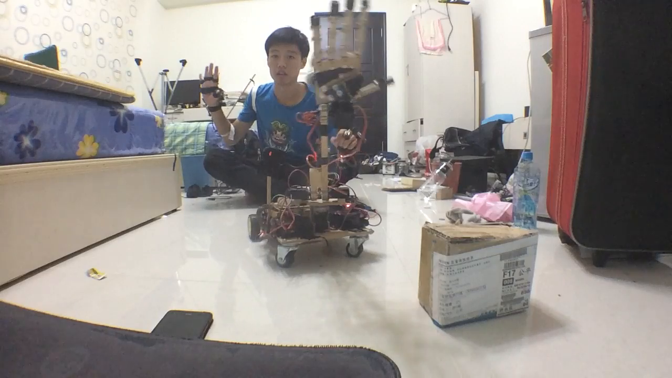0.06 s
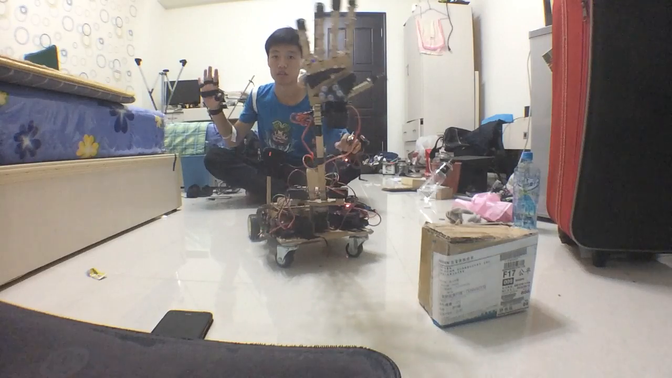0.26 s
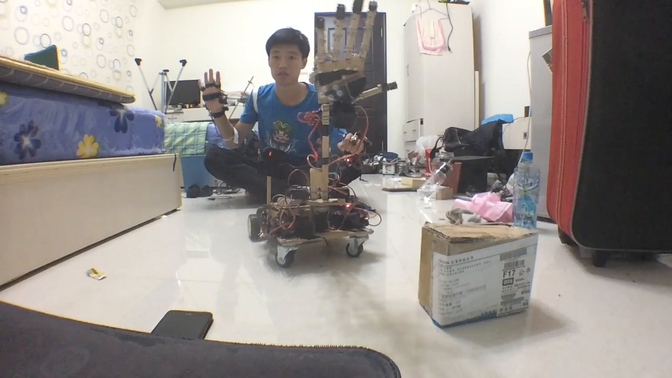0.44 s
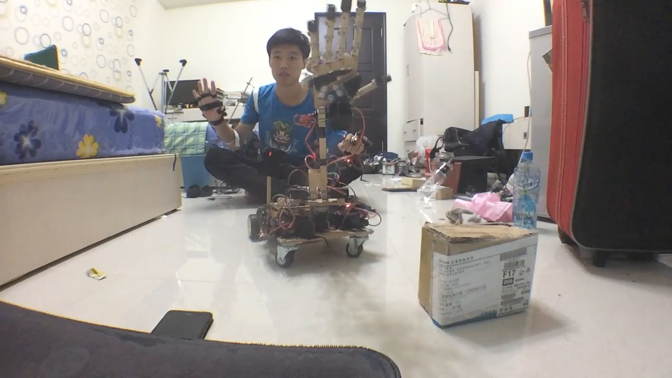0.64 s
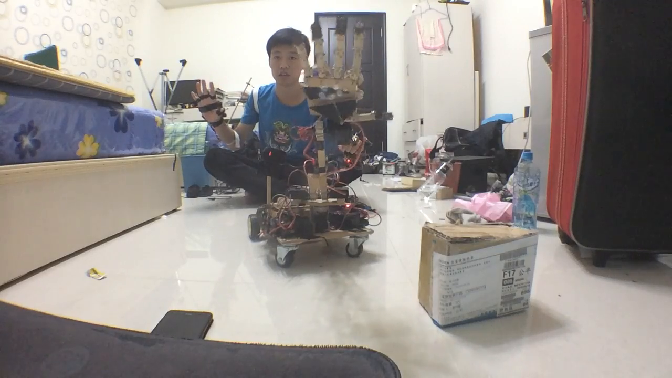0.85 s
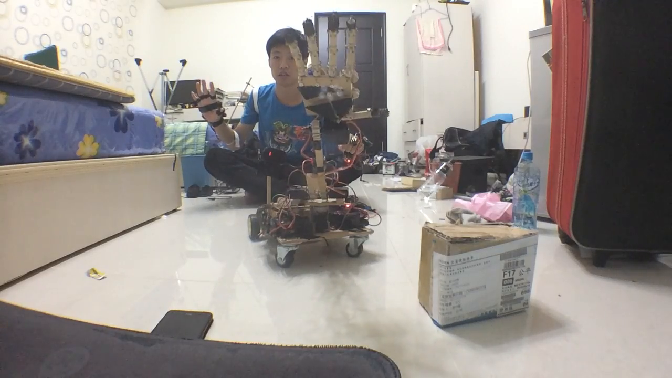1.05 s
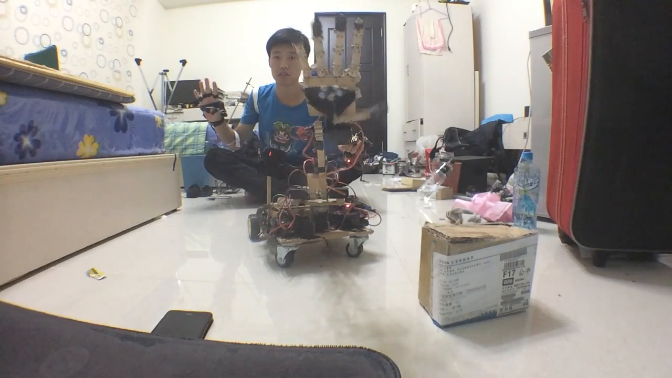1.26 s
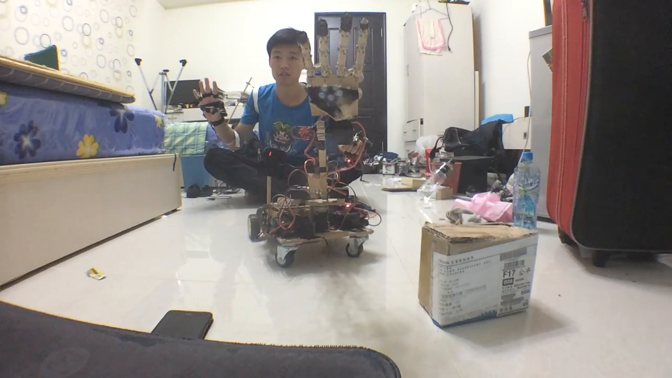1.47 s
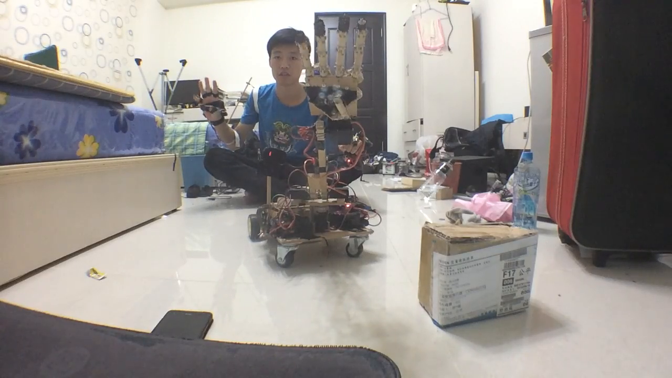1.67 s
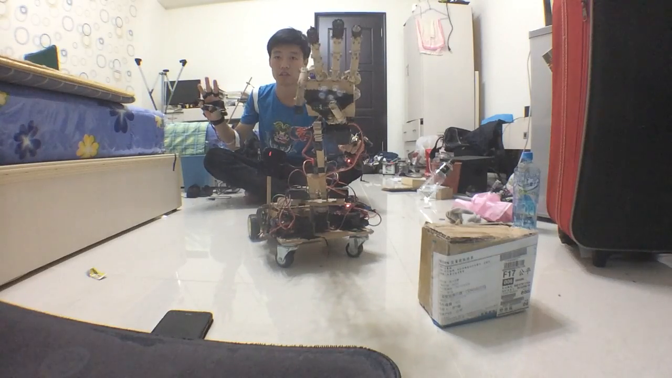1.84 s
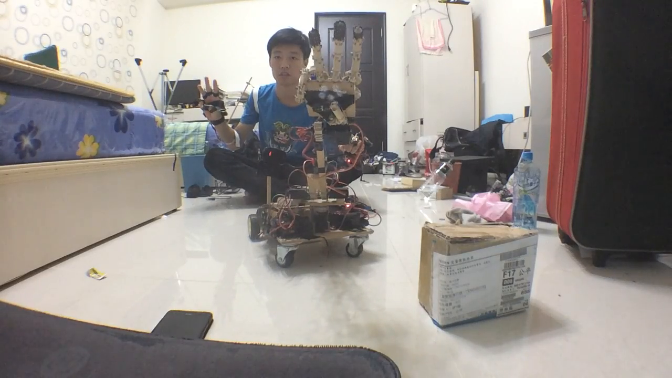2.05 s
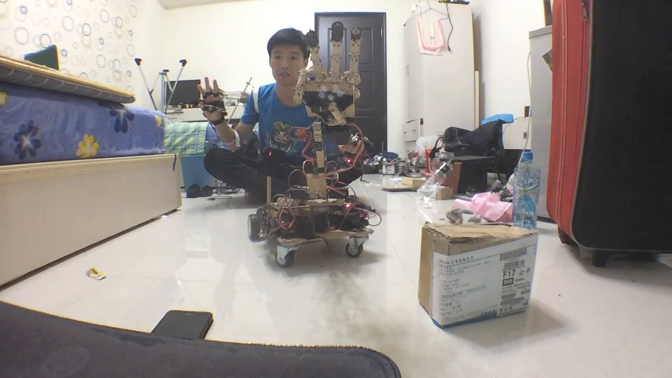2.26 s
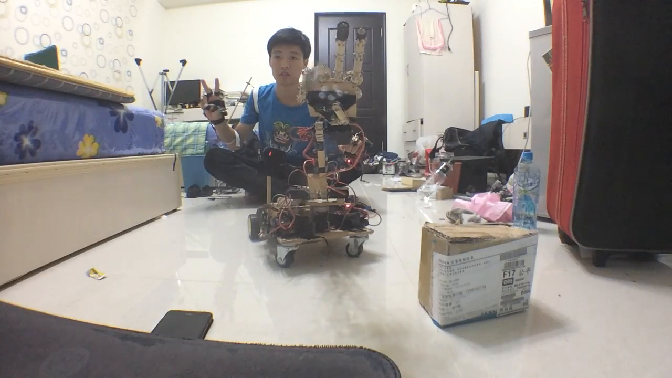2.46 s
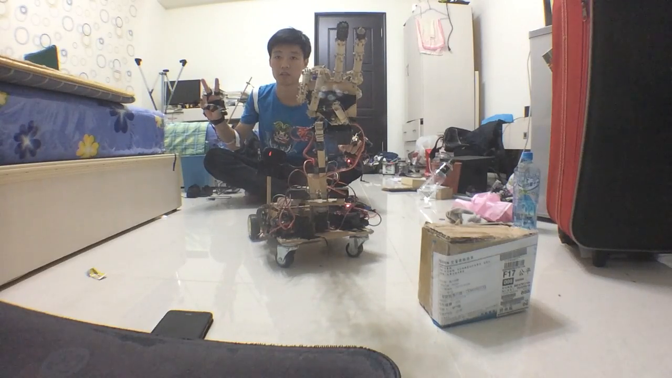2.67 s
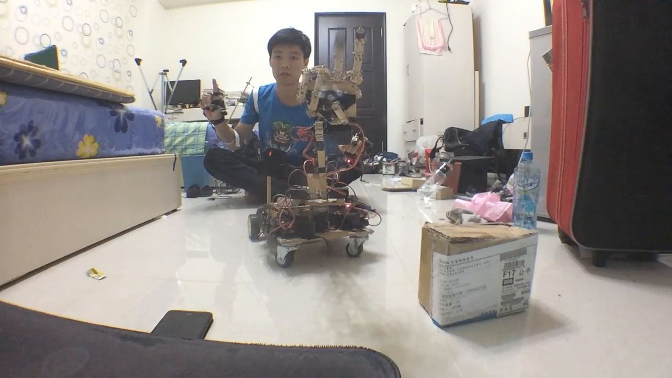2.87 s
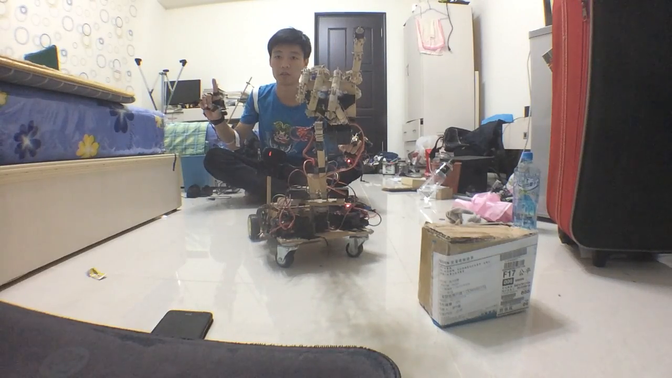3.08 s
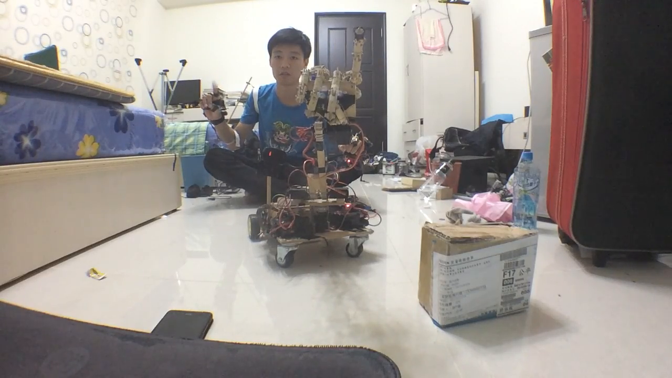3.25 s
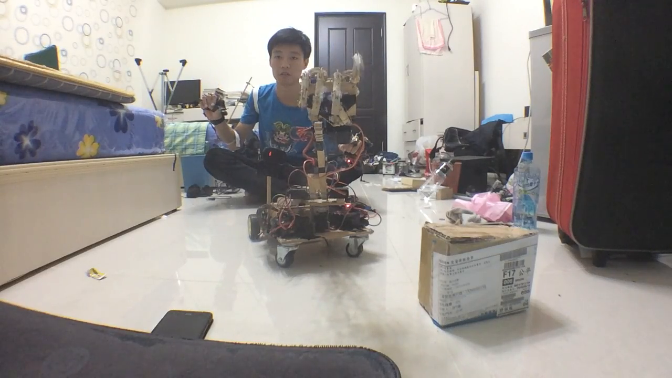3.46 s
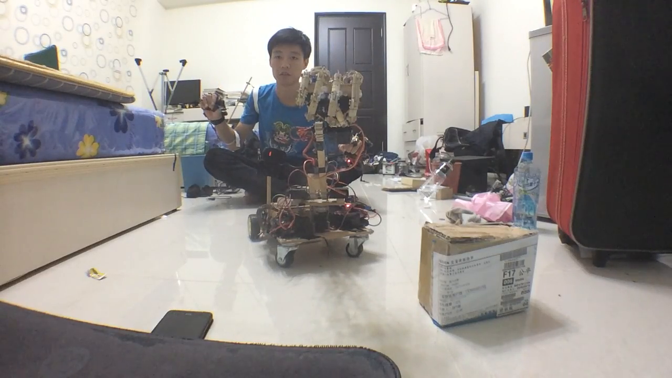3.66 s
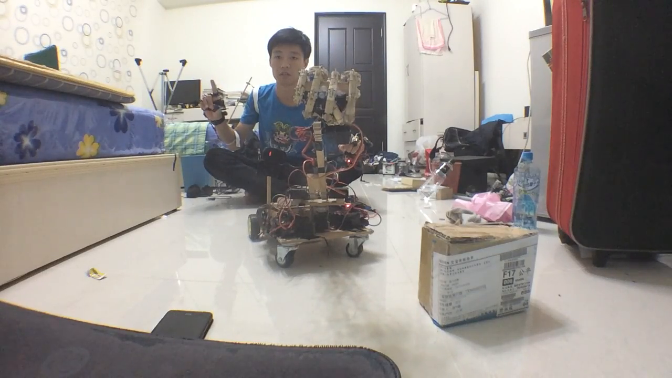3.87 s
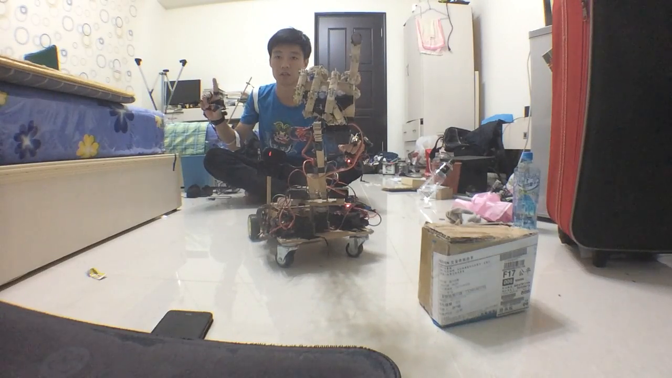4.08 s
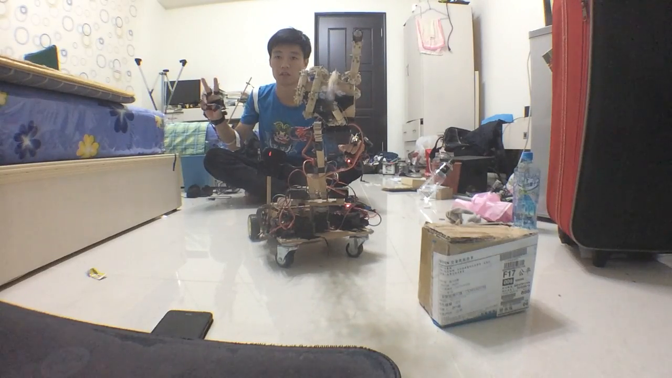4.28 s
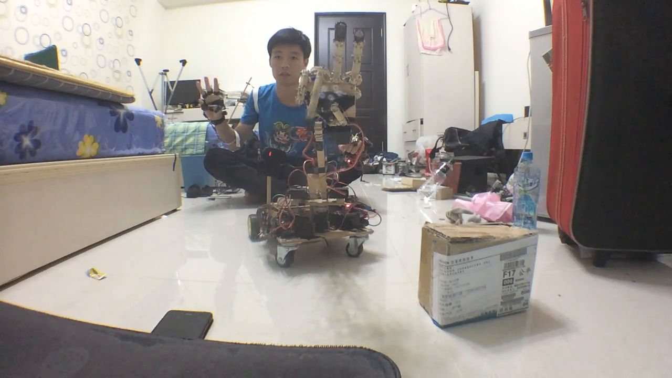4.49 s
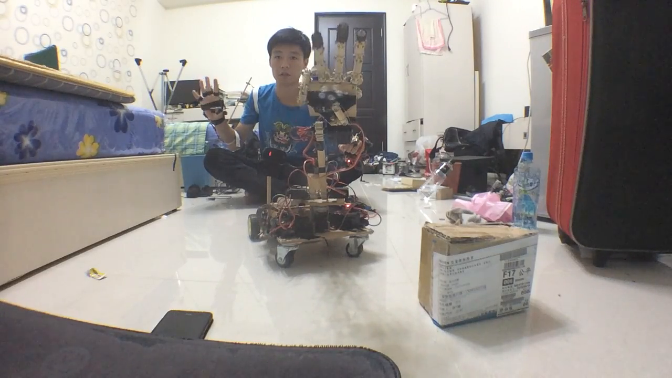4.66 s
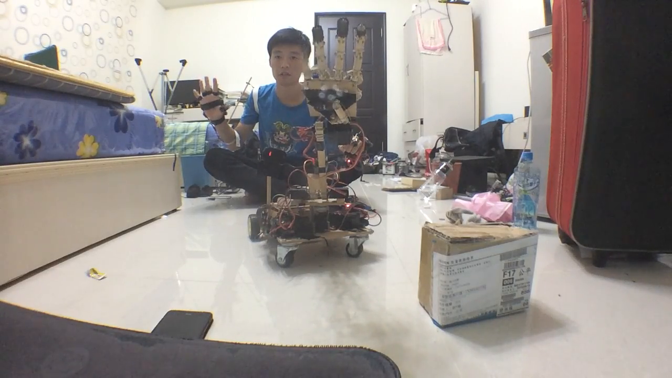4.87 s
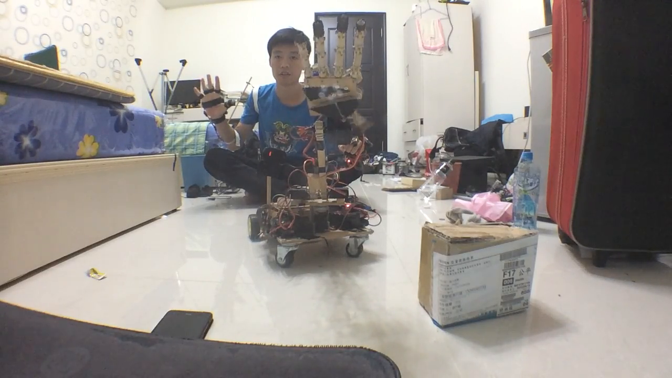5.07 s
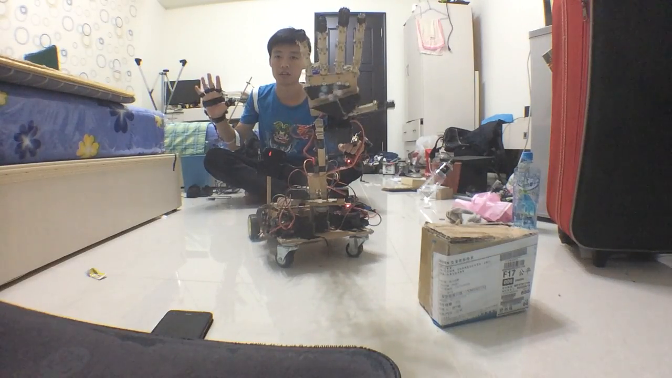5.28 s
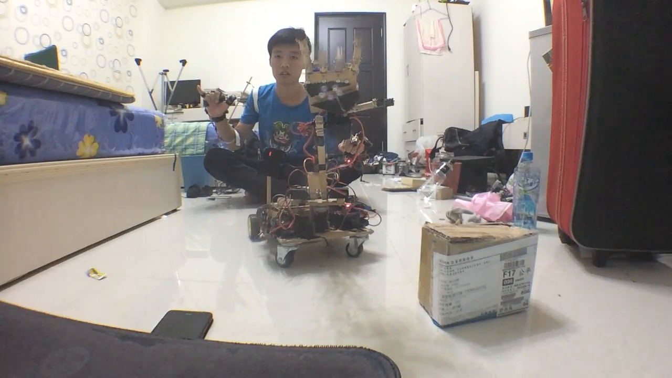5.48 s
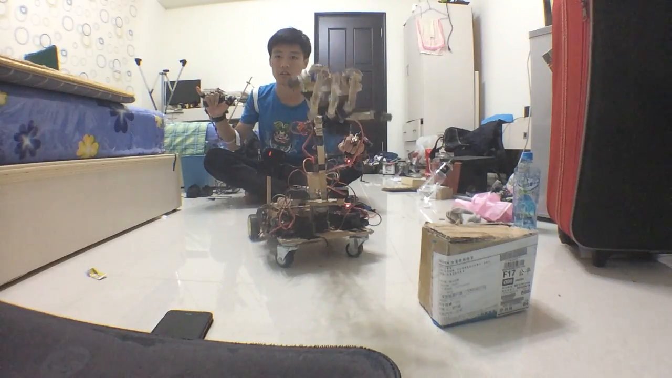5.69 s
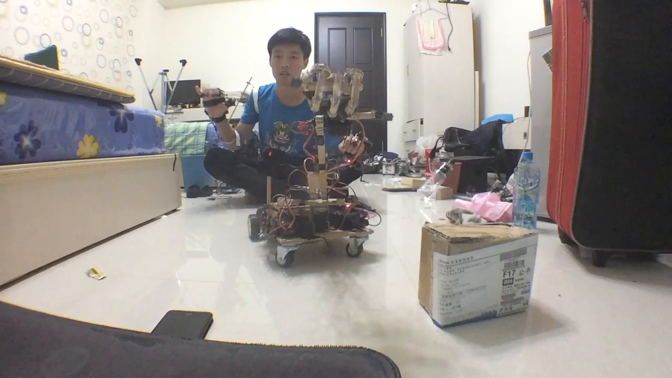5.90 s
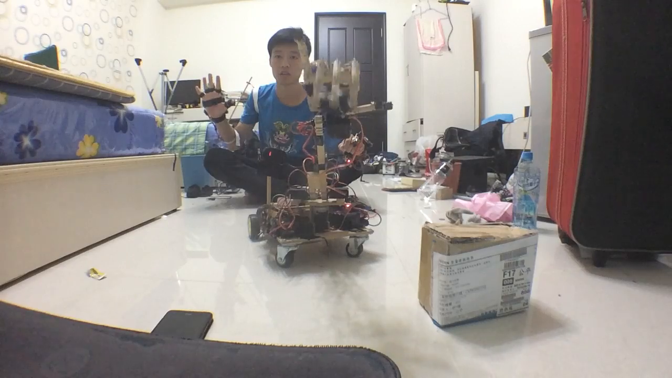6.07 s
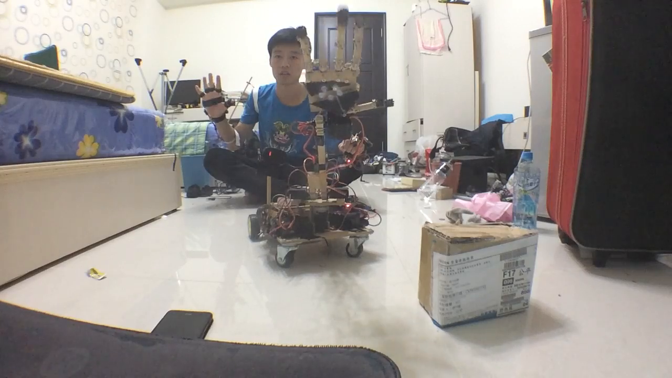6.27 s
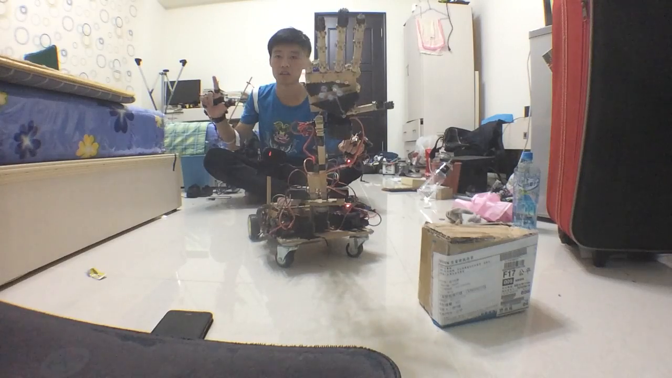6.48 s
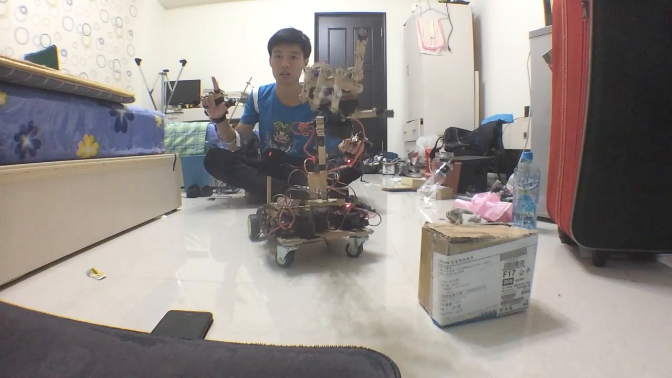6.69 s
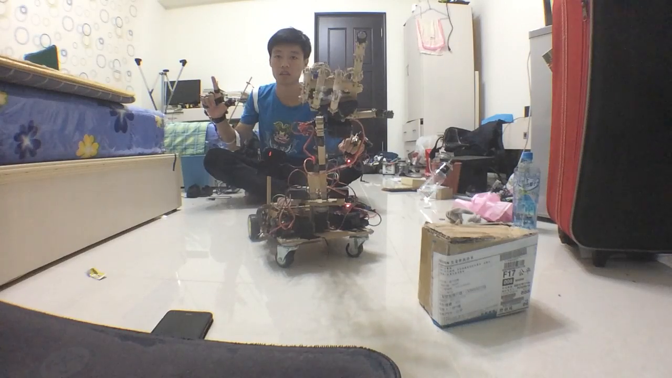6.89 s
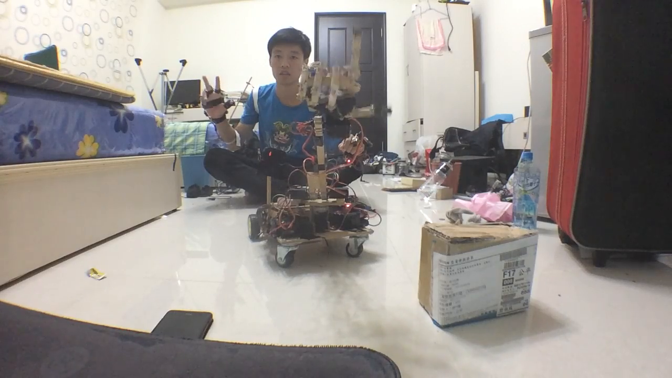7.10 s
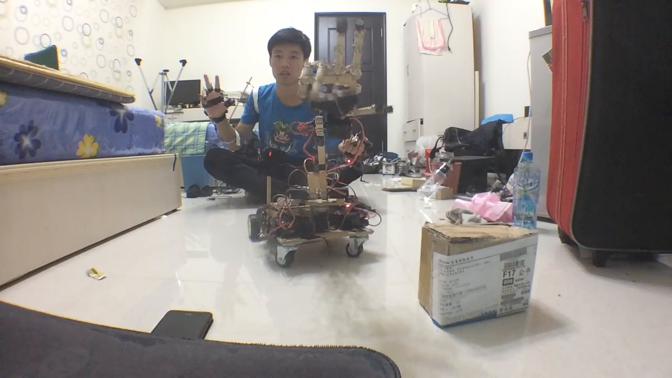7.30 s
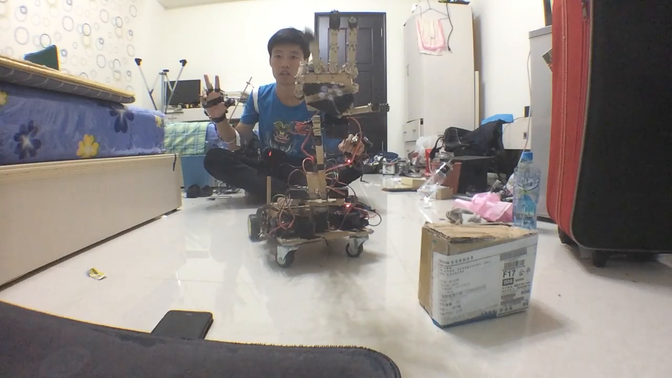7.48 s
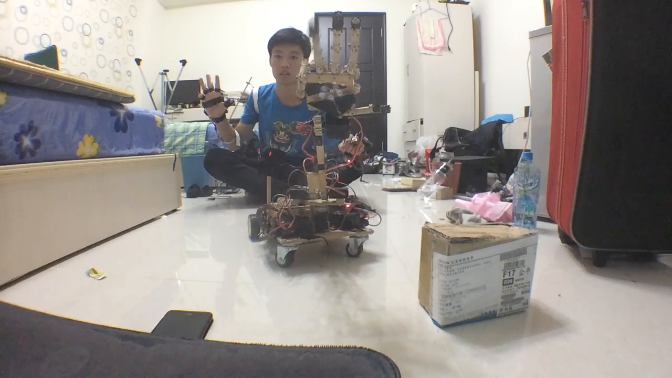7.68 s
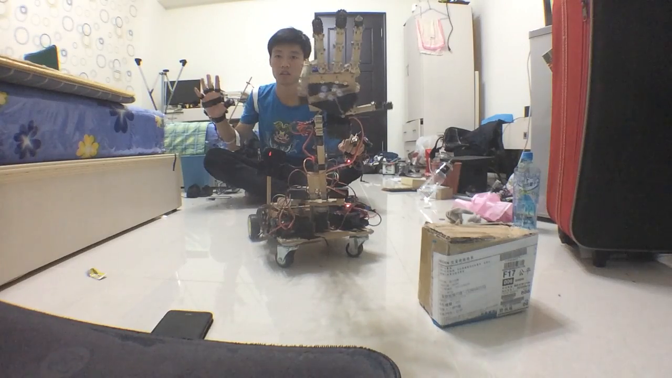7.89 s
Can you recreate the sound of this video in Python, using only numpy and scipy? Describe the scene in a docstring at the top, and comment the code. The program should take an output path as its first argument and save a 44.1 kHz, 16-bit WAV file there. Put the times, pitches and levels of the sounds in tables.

```python
"""A throbbing rattle starts and stops as small servo motors flex a cardboard robot hand's fingers.
The rattle is gear teeth knocking inside the servo cases; gears under load add a gliding whine.
The servos twitch, dry joints squeak, the plastic linkage clicks and the swaying arm rumbles.
A fan hums steadily behind it all, and the small tiled room adds a short echo."""
import sys
import numpy as np
from scipy import signal
from scipy.fft import rfft, irfft, next_fast_len
from scipy.io import wavfile
from scipy.ndimage import uniform_filter1d, map_coordinates

SR = 44100
rng = np.random.default_rng(int(sys.argv[2]) if len(sys.argv) > 2 else 0)


def put_to_file(sound):
    """Save the sound as 16-bit audio at rate SR, in the file named by the first command-line argument."""
    columns = np.atleast_2d(sound).T  # one column per channel
    safe = np.clip(columns, -1, 1)
    whole_steps = np.round(safe * 32767)
    wavfile.write(sys.argv[1], SR, whole_steps.astype(np.int16))


N = 350154
TIME = np.arange(N) / SR


def from_db(db):
    """Turn decibels into a gain."""
    return 10 ** (np.asarray(db) / 20)


def rms_one(x):
    """Scale a signal to an average (rms) level of 1."""
    return x / np.sqrt(np.mean(np.abs(x) ** 2) + 1e-20)


def band(x, low_hz, high_hz, order=2):
    """Keep the sound between two frequencies."""
    return signal.sosfilt(signal.butter(order, [low_hz, high_hz], "band", fs=SR, output="sos"), x)


def colour(x, spectrum):
    """Shape a sound's lows and highs along a smooth curve; the result has level 1."""
    hz, db = np.transpose(spectrum)
    size = next_fast_len(N)
    bins_hz = np.maximum(np.fft.rfftfreq(size, 1 / SR), 1)
    gain = from_db(np.interp(np.log(bins_hz), np.log(hz), db))
    return rms_one(irfft(rfft(x, size) * gain, size)[:N])


def resonate(x, hz, width_hz):
    """A resonance passes one pitch and weakens the rest."""
    r = np.exp(-np.pi * width_hz / SR)
    feedback = [1, -2 * r * np.cos(2 * np.pi * hz / SR), r * r]
    return signal.lfilter(np.array([1, 0, -1]) * (1 - r * r) / 2, feedback, x)


def ring(clicks, hz, ring_s):
    """Each click starts a tone that fades by 60 dB in ring_s."""
    r, w = np.exp(-np.log(1000) / (ring_s * SR)), 2 * np.pi * hz / SR
    return signal.lfilter([0, np.sin(w)], [1, -2 * r * np.cos(w), r * r], clicks + 1e-18)


def smooth(x, rate_hz):
    """Smooth away changes faster than rate_hz."""
    r = np.exp(-2 * np.pi * rate_hz / SR)
    return signal.lfilter([1], [1, -2 * r, r * r], x)


def drift(rate_hz):
    """A smooth random wander, about 1 in size."""
    return rms_one(smooth(rng.standard_normal(N + SR), rate_hz)[SR:])


def stroke(start_s, length_s, rise_s, fade_s, swell_db=0):
    """The loudness of one movement: it rises, swells or sags, then dies away."""
    t = TIME - start_s
    rise = np.clip(t / rise_s, 0, 1)
    hold = from_db(swell_db * (np.clip(t / length_s, 0, 1) - .5))
    fade = np.exp(-np.clip((t - length_s) / fade_s, 0, 20))
    return rise * hold * fade


# The tone of the fan's rushing air: frequency_hz, gain_db
FAN_AIR = [(15, -58), (25, -12), (56, 3), (82, -7.5), (147, -9.5), (198, -8), (239, -6.5), (398, -11.5),
           (521, -9), (1110, -14), (3070, -20), (6340, -19.5), (7870, -25.5), (13100, -31.5), (15400, -37)]
# Hum from the fan and the mains: pitch_hz, level_db
FAN_HUM = [(80, -57.5), (119, -62.5), (196, -59), (522, -71), (587, -72), (1743, -78)]
def fan(waver_rad, swell_db):
    """Air rushes steadily, the housing booms and a few humming tones waver."""
    air = from_db(-53) * colour(rng.standard_normal(N), FAN_AIR)
    boom = from_db(-56.5) * rms_one(resonate(rng.standard_normal(N), hz=83.0, width_hz=16.3))
    out = air + boom
    for pitch_hz, level_db in FAN_HUM:
        swell = from_db(swell_db * drift(5.8))
        tone = np.sin(2 * np.pi * pitch_hz * TIME + waver_rad * drift(4.9))
        out += from_db(level_db) * rms_one(swell * tone)
    return band(out, 27, 19000)


def room(x, first_echo_s, ring_s):
    """Many echoes from tiles and walls blend and fade by 60 dB in ring_s."""
    t = TIME[:SR // 2]
    echoes = band(rng.standard_normal(len(t)), 300, 13000, order=1)
    tail = echoes * from_db(-60 * t / ring_s) * (t > first_echo_s)
    return signal.fftconvolve(x, tail / np.linalg.norm(tail))[:N]


def palm_echo(x, delay_s, wander_s):
    """The palm throws back a close echo whose delay wanders as the fingers move."""
    lag = (delay_s + wander_s * drift(1.42)) * SR
    return map_coordinates(x, [np.arange(N) - lag], order=3)


# Sways of the arm: start_s, length_s, rise_s, fade_s, level_db
ARM_SWAYS = [(.03, 0.14, 0.093, .1, -56), (0.698, 0.093, .04, .06, -51.5), (0.844, 0.17, 0.069, 0.2, -55)]
def arm_sway(scuff_db):
    """The arm's frame rumbles dully and its cardboard scuffs."""
    rub = rng.standard_normal(N)
    rumble = rms_one(band(rub, 210, 710))
    scuff = from_db(scuff_db) * rms_one(band(rub, 1400, 3000))
    return (rumble + scuff) * sum(from_db(db) * stroke(*timing) for *timing, db in ARM_SWAYS)


# Squeaks of the finger joints: start_s, length_s, start_hz, end_hz, peak_db
JOINT_SQUEAKS = [(3.034, 0.019, 1730, 2520, -33.5), (3.034, 0.032, 1650, 1800, -43.5),
                 (3.081, 0.018, 3200, 2270, -29.5), (5.606, 0.0218, 1805, 2410, -35),
                 (5.654, 0.013, 2790, 2400, -36.5), (6.658, 0.0134, 3640, 4100, -32),
                 (6.673, 0.012, 1840, 2390, -31.5), (6.716, 0.015, 2810, 2600, -33)]
def joint_squeaks():
    """Dry joints stick and slip, making short sliding chirps."""
    out = np.zeros(N)
    for start_s, length_s, start_hz, end_hz, peak_db in JOINT_SQUEAKS:
        size, at = int(length_s * SR), round(start_s * SR)
        phase = 2 * np.pi * np.cumsum(np.linspace(start_hz, end_hz, size)) / SR
        out[at:at + size] += from_db(peak_db) * np.hanning(size) * np.sin(phase)
    return out


# Snaps of the linkage: start_s, strength_db
LINKAGE_SNAPS = [(5.1087, -11), (5.19, -29), (5.249, -13), (5.2925, -39)]
# Each snap is a catch, the main knock and two rebounds: delay_s, gain_db
SNAP_KNOCKS = [(0, -6), (.00052, 0.5), (.00095, 0), (.0026, -5.5)]
# The tones the linkage rings with: pitch_hz, gain_db, ring_s
LINKAGE_TONES = [(1500, -25, 0.012), (2300, -26, .01), (3070, -2.5, 0.0036), (3910, -3.5, 0.0091),
                 (4700, -6, 0.0056), (5500, -5.5, 0.0072), (5860, -8, 0.0072), (7130, -7.5, 0.0054),
                 (8400, -11.5, 0.0076), (10800, -12, 0.0036)]
def linkage_snaps():
    """The plastic linkage snaps over, and the quick knocks set it ringing."""
    force = np.zeros(N)
    for start_s, strength_db in LINKAGE_SNAPS:
        for delay_s, gain_db in SNAP_KNOCKS:
            at = round((start_s + delay_s * rng.uniform(.95, 1.05)) * SR)
            force[at] += from_db(strength_db + gain_db)
    ringing = sum((-1) ** k * from_db(db) * ring(force, hz, ring_s)   # neighbours swing opposite ways
                  for k, (hz, db, ring_s) in enumerate(LINKAGE_TONES))
    return band(ringing, 1300, 15000)


def tooth_impacts(per_s, spread_db, rub):
    """Gear teeth knock fast and unevenly over a little rubbing noise."""
    hits = (rng.random(N) < per_s / SR) * rng.choice([-1, 1], N)
    knocks = hits * from_db(spread_db * rng.standard_normal(N))
    return rms_one(rms_one(knocks) + rub * rng.standard_normal(N))


# Twitches of a servo: start_s, level_db
SERVO_TWITCHES = [(.558, -47), (1.088, -42), (1.601, -30), (1.811, -45.5), (2.215, -44.5), (2.357, -52),
                  (2.42, -50.5), (2.513, -40), (2.557, -41), (2.866, -51), (2.963, -37), (3.486, -41),
                  (4.625, -31), (6.054, -35), (6.543, -45), (7.02, -55), (7.056, -47.5), (7.09, -52),
                  (7.64, -49), (7.686, -48), (7.729, -34.5)]
def servo_twitches(teeth, fade_s, edge_db):
    """A single control pulse shakes the gears briefly: the case rings with a bright edge."""
    pulses = np.zeros(N)
    for start_s, level_db in SERVO_TWITCHES:
        pulses[round(start_s * SR)] += from_db(level_db)
    shake = signal.lfilter([1], [1, -np.exp(-1 / (fade_s * SR))], pulses + 1e-18)
    case = rms_one(band(teeth, 4930, 6600))
    edge = from_db(edge_db) * rms_one(band(teeth, 3500, 8800))
    return shake * (case + edge)


def motor_throb(rate_hz, depth_db, wander, rough_db, kick, load_db):
    """The motor is fed in pulses, so the gears surge rapidly under an uneven load."""
    phase = 2 * np.pi * np.cumsum(rate_hz * (1 + wander * drift(6.9))) / SR
    pulse = np.sin(phase) + kick * np.sin(2 * phase)   # quick rise, slower coast
    surge = from_db(depth_db * pulse + rough_db * drift(57))
    local_level = np.sqrt(uniform_filter1d(surge ** 2, size=2400))
    return surge / local_level * from_db(load_db * drift(7.7))


# Gliding whines and groans of the gears: start_s, length_s, start_hz, end_hz, level_db
GEAR_WHINES = [(.11, 0.088, 656, 488, -52), (.215, 0.043, 360, 300, -47.5), (3.1, 0.13, 6500, 5800, -34.5),
               (3.465, 0.091, 6280, 6740, -36), (3.55, 0.077, 7100, 7850, -44),
               (3.46, 0.31, 3280, 3480, -56), (3.94, 0.33, 3390, 3330, -52), (4.0, 0.11, 3620, 3530, -50),
               (4.01, 0.097, 7400, 7200, -36), (4.09, 0.11, 7000, 6720, -40),
               (4.16, 0.081, 6400, 6040, -34.5), (3.98, 0.23, 10750, 10250, -45),
               (4.38, 0.15, 1200, 1085, -57), (4.472, 0.092, 5500, 4930, -37),
               (4.5, 0.2, 4810, 4840, -31.5), (4.63, 0.088, 7950, 8000, -32.5),
               (4.66, 0.095, 2880, 2700, -54), (4.78, 0.13, 3950, 3820, -53),
               (7.255, 0.089, 3900, 3860, -37), (7.4, 0.081, 4940, 4770, -36)]
def gear_whine(surge, blur_share, clean, throb_power):
    """Loaded gears sing at the rate their teeth meet; slack between the teeth blurs the pitch."""
    out = np.zeros(N)
    slack = rng.standard_normal(N) + 1j * rng.standard_normal(N)
    for start_s, length_s, start_hz, end_hz, level_db in GEAR_WHINES:
        at = np.flatnonzero((TIME >= start_s) & (TIME < start_s + length_s))
        pitch_hz = np.linspace(start_hz, end_hz, len(at))
        tone = np.exp(2j * np.pi * np.cumsum(pitch_hz) / SR)
        blur = rms_one(clean + rms_one(smooth(slack[at], blur_share * pitch_hz.mean())))
        swell = np.sin(np.linspace(0, np.pi, len(at)))
        out[at] += swell * from_db(level_db) * np.real(blur * tone)
    return out * rms_one(surge ** throb_power)   # the whine throbs more deeply than the rattle


# The overall tone of the gearbox: frequency_hz, gain_db
GEARBOX_TONE = [(880, -54), (1500, -4), (1900, -8.5), (2110, -10), (2420, -10), (2720, -11), (3150, -12.5),
                (3820, -4), (4300, -5.5), (4740, -1), (6280, 3), (8750, -7), (11400, -9), (13600, -16),
                (15400, -17)]
# Resonances of the servo cases: pitch_hz, width_hz, gain_db
CASE_RINGS = [(2790, 220, -13), (3940, 310, -26), (4890, 89, -6.5), (5490, 140, -5.5), (6110, 240, -7.5),
              (7500, 130, -3), (8180, 170, -7), (8220, 250, -5), (9520, 130, -14), (10860, 400, -15)]
def gearbox(teeth, flutter_db):
    """Knocking teeth ring the cases, giving a low growl, a middle rattle and a high fizz."""
    case = colour(teeth, GEARBOX_TONE)
    case = case + sum(from_db(db) * resonate(case, hz, width_hz) for hz, width_hz, db in CASE_RINGS)
    growl = rms_one(band(case, 2000, 3546, order=3) + from_db(-10.5) * band(teeth, 950, 2110))
    rattle = rms_one(band(case, 4134, 7810, order=4))
    fizz = rms_one(band(case, 8760, 14000, order=4)) * from_db(flutter_db * drift(60))
    return growl, rattle, fizz


# Resonances of each named set of gears: pitch_hz, width_hz, gain_db (compared with the rattle)
GEAR_SET_RINGS = {"arm": [(6170, 1000, -3.5)], "shrill": [(4940, 320, -12.5), (6580, 930, -3),
                  (7550, 720, -6.5)], "hollow": [(3800, 350, -7.5), (4860, 450, 2.5), (5190, 470, 3.5),
                  (6520, 340, -0.5)], "thin": [(4540, 610, -12), (6600, 900, -8), (7740, 350, -17)],
                  "nasal": [(3700, 360, -18), (4800, 330, -9.5), (5510, 1000, -5.5)],
                  "low": [(3960, 560, -10), (4970, 610, -10.5), (6110, 550, -17)]}
def gear_sets(rattle):
    """Each set of gears adds its own ringing to the rattle, struck by the small driving gear."""
    knocks = tooth_impacts(per_s=1500, spread_db=6.0, rub=0.3)
    rattles = {}
    for name, rings in GEAR_SET_RINGS.items():
        ringing = sum(from_db(db) * rms_one(resonate(resonate(knocks, hz, width_hz), hz, width_hz))
                      for hz, width_hz, db in rings)
        rattles[name] = rms_one(rattle + ringing)
    return rattles


# Runs of a servo to a new position:
# start_s, length_s, spin_up_s, coast_s, level_db, swell_db, growl_db, fizz_db, gear_set
SERVO_MOVES = [(0, 0.46, 0.0034, 0.066, -55.5, -2, -4.5, -18, "arm"),
               (0.045, .158, 0.039, 0.021, -49.5, 6.5, -5.5, -9.5, "arm"),
               (.53, 0.15, 0.02, 0.023, -54, 6.5, -1, -10.5, "arm"),
               (.703, .181, 0.036, 0.048, -42, -0.5, -9, -18.5, "arm"),
               (1.285, 0.15, 0.03, 0.098, -35, 5.5, -19.5, -6.5, "shrill"),
               (1.464, 0.18, 0.067, 0.011, -37.5, -7, -22, -5.5, "shrill"),
               (1.792, 0.3, 0.029, 0.0055, -41.5, 3, -20, -4.5, "shrill"),
               (2.104, 0.011, .003, 0.01, -36.5, -2, -22, -8.5, "shrill"),
               (2.502, 0.21, 0.043, 0.034, -34.5, 2.5, -24.5, -9.5, "hollow"),
               (2.937, 0.025, .015, .004, -50.5, 0, -12, -10, "thin"),
               (2.957, 0.22, 0.011, 0.019, -34.5, 4, -17, -8, "thin"),
               (3.442, 0.064, 0.052, 0.083, -45.5, 0, -8, -5.5, "thin"),
               (3.524, 0.19, 0.037, 0.046, -47.5, 0, -12.5, -5.5, "thin"),
               (3.909, 0.31, 0.096, 0.046, -43.5, 2.5, -15.5, -3.5, "thin"),
               (4.247, 0.47, 0.13, .045, -35.5, -6, -18, -8, "nasal"),
               (4.727, 0.33, 0.08, 0.094, -43, 4, -16, -4, "arm"),
               (5.102, 0.17, 0.0089, 0.027, -33.5, 1, -20.5, -5, "arm"),
               (5.287, .011, .004, .004, -31, 3, -18, -5, "shrill"),
               (5.325, 0.095, .03, 0.11, -52, -7, -2.5, -9, "arm"),
               (5.497, .32, 0.065, 0.039, -35, -1.5, -15.5, -7, "low"),
               (6.047, 0.05, 0.0066, 0.3, -45, 5, -7.5, -7, "low"),
               (6.116, 0.26, .015, 0.039, -35, 8, -17.5, -5.5, "low"),
               (6.541, 0.27, 0.081, 0.069, -36, 1, -13.5, -5.5, "low"),
               (6.817, 0.093, 0.092, 0.013, -40, -2, -21, -5, "low"),
               (7.173, .02, 0.011, 0.0054, -54, 0, -6, -8, "nasal"),
               (7.196, 0.03, .003, 0.03, -43, 3, -9, -10.5, "nasal"),
               (7.209, 0.26, 0.067, .057, -35.5, 0, -13.5, -5, "nasal"),
               (7.71, .13, 0.044, 0.046, -45.5, 2, -11, -7, "nasal")]
def servo_moves(teeth, surge):
    """A servo spins up, runs and coasts, each time with its own growl (load) and fizz (speed)."""
    growl, rattle, fizz = gearbox(teeth, flutter_db=1.0)
    rattles = gear_sets(rattle)
    out = np.zeros(N)
    for *timing, level_db, swell_db, growl_db, fizz_db, gear_set in SERVO_MOVES:
        whir = rattles[gear_set] + from_db(growl_db) * growl + from_db(fizz_db) * fizz
        whir = np.roll(whir, rng.integers(N))   # every run meets other teeth
        out += from_db(level_db) * stroke(*timing, swell_db) * whir
    return out * surge


def scene():
    """The hand, its echoes and the fan, the same in both channels."""
    teeth = tooth_impacts(per_s=5000, spread_db=2.0, rub=0.31)
    surge = motor_throb(rate_hz=75.4, depth_db=1.1, wander=0.0317, rough_db=0.9, kick=0.22, load_db=0.45)
    hand = servo_moves(teeth, surge) + gear_whine(surge, blur_share=0.034, clean=0.29, throb_power=2.54)
    hand += from_db(-9.5) * palm_echo(hand, delay_s=.0022, wander_s=0.000152)
    hand += servo_twitches(teeth, fade_s=0.0049, edge_db=-11.5) + joint_squeaks() + linkage_snaps()
    echoes = from_db(-12) * room(hand, first_echo_s=0.0028, ring_s=0.32)
    mono = hand + echoes + arm_sway(scuff_db=-9) + fan(waver_rad=0.67, swell_db=3.0)
    return np.stack([mono, mono])


def record(dry):
    """Cut the highest treble steeply."""
    cutoff_hz = 15500
    return signal.sosfilt(signal.ellip(12, .1, 90, cutoff_hz, fs=SR, output="sos"), dry)


dry = scene()
out = record(dry)
put_to_file(out)
```